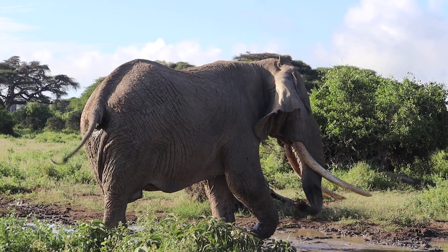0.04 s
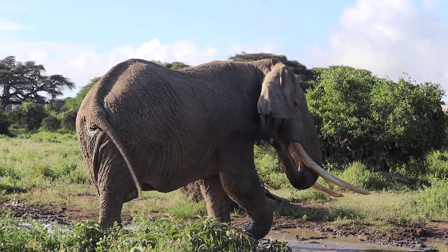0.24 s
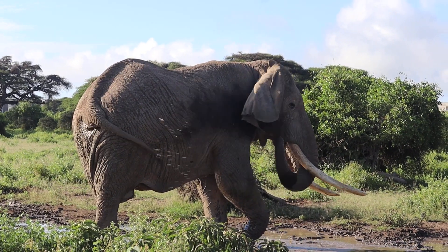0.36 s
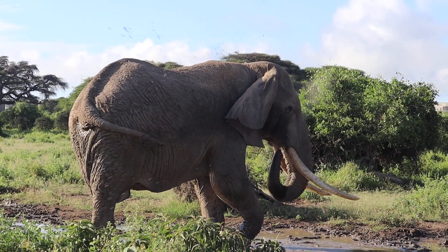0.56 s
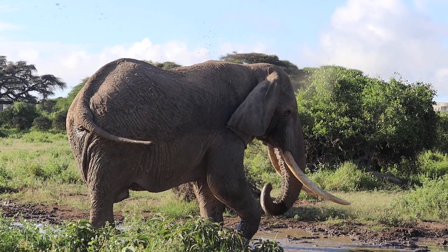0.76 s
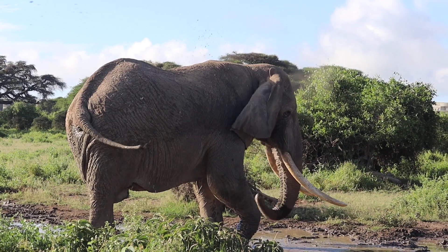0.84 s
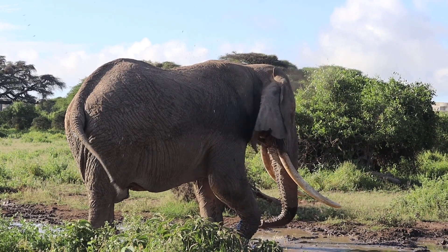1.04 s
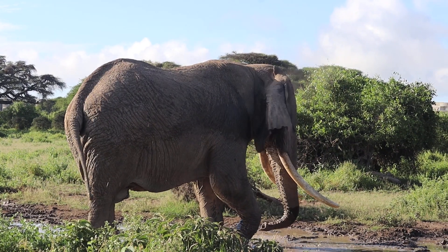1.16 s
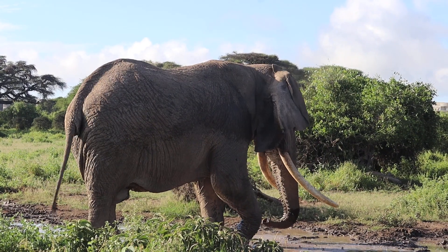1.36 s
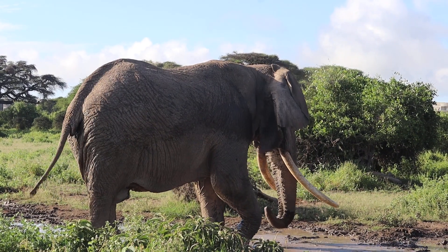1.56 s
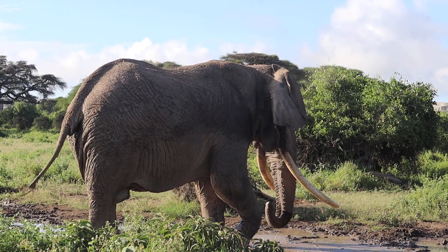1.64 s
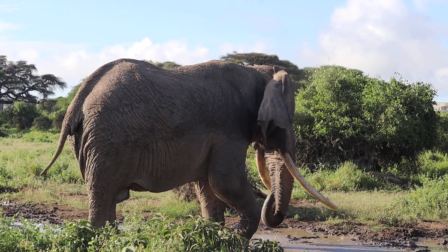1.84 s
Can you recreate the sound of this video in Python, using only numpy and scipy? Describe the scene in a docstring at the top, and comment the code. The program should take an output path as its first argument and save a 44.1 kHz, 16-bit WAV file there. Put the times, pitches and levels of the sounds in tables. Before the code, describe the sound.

An elephant close by sprays muddy water from its trunk, with air rushing and gurgling from about 0.2 to 0.9 seconds. The spray hits its hide, loudest near 0.5, and mud lumps smack down around 0.7. Drops and soft splats patter on to the end. Crickets trill throughout over a faint low hum like a far engine, and a distant bird gives one rising whistle at 1.8 seconds.

```python
"""Crickets trill round a waterhole, a few drops fall, and a low hum like a far engine lies under it all.
Near the stereo microphones an elephant blows muddy water from its trunk over its flank:
air rushes through the trunk and rings it, the spray hits the hide, then drops and lumps of mud
patter down. At the end a bird whistles once, far off."""
import sys
import numpy as np
from scipy import signal
from scipy.fft import rfft, irfft
from scipy.io import wavfile

SR = 44100
rng = np.random.default_rng(int(sys.argv[2]) if len(sys.argv) > 2 else 0)


def transcribe(u):
    """Save the signal u as a 16-bit wav file named by the first command-line argument.

    u: samples, shape (n,) or (channels, n), limited to [-1, 1]; the rate is SR.
    q: integer samples, one column per channel.
    """
    v = np.clip(np.atleast_2d(u).T, -1, 1)
    q = np.round(v * 32767).astype(np.int16)
    wavfile.write(sys.argv[1], SR, q)


N = 83790
T, HZ = np.arange(N) / SR, np.fft.rfftfreq(N, 1 / SR)

AIR_TONE = [(15, -36), (28, -20), (42, 1), (52, -5), (82, -5), (130, -2), (175, -4), (240, -8), (900, -9.5),
            (2800, -8), (4200, -8.5), (8000, -30.5), (16000, -44)]  # open air over the waterhole: f/Hz, level/dB
AIR_LIKENESS = [(60, .998), (300, 0.97), (1400, .72), (4000, 0.14), (15000, 0.096)]  # that air at the two microphones: f/Hz, correlation
# nearer crickets: first chirp t/s, period/s, level/dB, left minus right/dB, left phase lead/rad
CRICKETS = [(0.006, .0898, -34.5, -0.5, 2.5), (0.0795, .0875, -35, 1, 2.2), (0.002, .0745, -40.5, -1, -2.0)]
CHORUS_TONE = [(4200, -26), (4600, -11.5), (4900, -3), (5150, -3), (5520, -7), (5720, -30), (6200, -35)]  # far crickets: f/Hz, level/dB
DRIP_LEVEL = [(0.0, -58), (0.05, -60), (0.07, -46), (0.115, -64.5), (0.9, -50), (1.06, -57), (1.19, -51.5),
              (1.275, -46.5), (1.36, -48.5), (1.46, -47), (1.65, -49.5), (1.72, -56.5), (1.82, -50),
              (1.9, -55)]  # water dripping to the ground: t/s, level/dB
DRIP_TONE = [(150, -29), (450, -16.5), (750, -8.5), (1400, -1), (2900, 0.5), (4200, -7.5), (7000, -9.5),
             (16000, -21)]  # its patter: f/Hz, level/dB
# soft mud splats and, at 0.652 s, a short gurgle in the trunk: t/s, level/dB, centre f/Hz, decay/s
SPLATS_AND_GURGLE = [(0.0, -49, 173, 0.043), (0.016, -45, 2300, 0.0059), (0.344, -39, 278, 0.026),
                     (0.349, -36, 1260, 0.021), (0.431, -46.5, 117, 0.076), (0.652, -38, 660, .03),
                     (0.705, -54, 176, 0.077), (0.778, -39, 1200, .012), (0.919, -49.5, 660, 0.016),
                     (1.615, -57, 300, .025), (1.262, -43.5, 1130, 0.017), (1.264, -46, 2370, 0.015),
                     (1.31, -43, 2420, 0.0096), (1.383, -41.5, 1240, 0.019), (1.405, -41.5, 2070, 0.0084),
                     (1.452, -43, 3380, 0.012), (1.52, -49, 6500, .012), (1.491, -35, 2560, 0.0063),
                     (1.501, -39, 2180, 0.0044), (1.527, -39.5, 1840, 0.0063), (1.559, -39.5, 1350, 0.018),
                     (1.564, -49, 650, 0.013), (1.618, -46.5, 2780, 0.081), (1.734, -41.5, 2060, 0.0071),
                     (1.84, -49, 824, 0.066)]
TIP_LEVEL = [(0.14, -85), (0.18, -40.5), (0.245, -44.5), (0.295, -36), (0.335, -38.5), (0.36, -35),
             (0.41, -35.5), (0.46, -39), (0.56, -38.5), (0.66, -36.5), (0.79, -36), (0.87, -48),
             (0.97, -53), (1.05, -64)]  # air through the trunk tip: t/s, level/dB
TIP_PITCH = [(0.17, 1170), (0.29, 1197), (0.35, 1257), (0.45, 1120), (0.59, 1105), (0.74, 1112),
             (0.85, 1332), (0.95, 1166)]  # main resonance of the tip: t/s, f/Hz
TIP_MODES = [(0.799, 225, -9), (0.981, 194, -1.5), (1.17, 259, -6), (1.62, 450, -10.5), (2.4, 800, -13)]  # resonances that move with it: frequency ratio, width/Hz, level/dB
TUBE_LEVEL = [(0.26, -82), (0.3, -52), (0.36, -51.5), (0.46, -46), (0.6, -48.5), (0.72, -40), (0.8, -48),
              (0.93, -56), (1.02, -82)]  # low rush inside the trunk: t/s, level/dB
TUBE_MODES = [(123, 61, -8), (174.7, 54, -3.5), (286, 170, -7.5), (450, 180, -8), (669, 235, 1.5)]  # resonances of that tube: f/Hz, width/Hz, level/dB
SPRAY_LEVEL = [(0.15, -62), (0.175, -39.5), (0.25, -46), (0.32, -39.5), (0.37, -32), (0.446, -31),
               (0.461, -24.5), (0.497, -27.5), (0.524, -33.5), (0.62, -40.5), (0.71, -39), (0.77, -48.5),
               (0.86, -54.5), (1.0, -61)]  # spray landing on the hide: t/s, level/dB
SPRAY_TONE = [(150, -54), (400, -15.5), (620, -4.5), (1000, -4.5), (1700, -3), (2300, -3), (3700, -3.5),
              (4200, -8), (5000, -2.5), (7000, -21.5), (16000, -35)]  # its coarse drops: f/Hz, level/dB
MIST_LEVEL = [(0.17, -14), (0.33, -9), (0.4, -7), (0.47, -0.5), (0.58, 2.5), (0.7, -0.5), (0.8, 3),
              (1.0, -4)]  # rise and fall of fine mist within the spray: t/s, level/dB
MIST_TONE = [(150, -53), (3000, -9), (6500, 3.5), (9000, -0.5), (12000, -1), (16000, -6.5)]  # that mist: f/Hz, level/dB
SLAPS = [(0.1511, -24.5, 4100, 0.00037), (0.1516, -30, 3030, .0008), (0.634, -24, 1130, 0.00075),
         (0.7146, -12, 2420, 0.00027), (0.714, -24, 3720, 0.0002), (0.7178, -22.5, 1040, 0.00054),
         (0.7218, -23, 1060, 0.00053), (1.493, -37, 2850, 0.00051)]  # single lumps landing: t/s, level/dB, f/Hz, time to peak/s
BIRD_PITCH = [(1.78, 2872), (1.84, 3380), (1.895, 4150)]  # the far whistle: t/s, f/Hz
NEAR_LIKENESS = [(60, .998), (300, 1), (1400, 0.91), (3100, 0.64), (7000, 0.64), (15000, 0.29)]  # the elephant's noise at the two microphones: f/Hz, correlation
ELEPHANT_PAN = [(100, -2), (800, 0), (2400, -3.5), (4400, -4), (8000, -2), (15000, -12.5)]  # balance from where it stands: f/Hz, left minus right/dB
BOUNCES = [(.0031, -20.5), (.0064, -14.5), (0.0136, -15.5)]  # reflections off ground and body: delay/s, level/dB

AIR_DB, HUM_DB, HUM_HZ, HUM_WAVER = -54.5, -57, 62, 0.19
CHIRP_S, CHIRP_TOP_HZ, CHIRP_END_HZ, CHIRP_JITTER_S = 0.03, 5696, 4746, .0007
CHORUS_DB, BIRD_DB = -42, -49
BUBBLE_LOW_HZ, BUBBLE_HIGH_HZ, BUBBLES_PER_S = 656.4, 3710, 12  # the rate is for each size
BUBBLE_DECAY_CYCLES, BUBBLE_GLIDE, BUBBLE_DB = 4, 3.23, -7  # the level is against the patter
SWELL_RISE_S, SWELL_WIDTH = 0.0058, 0.53  # the width is a share of the pitch
GURGLE_DEPTH, GURGLE_HZ, FLUTTER_DB, FLUTTER_HZ = 0.048, 69, 1, 90
MIST_TRIM_DB = -1
ECHO_T60_S, CHIRP_ECHO_DB, GROUND_ECHO_DB, SLAP_ECHO_DB = 0.11, -1, -9, -3.5
LEFT_LEAD_S, BAND_LIMIT_HZ = .000006, 16050


def amp(db):
    """Decibels to gain."""
    return 10 ** (np.asarray(db) / 20)


def unit(x):
    """Scales to rms 1."""
    return x / np.sqrt(np.mean(x ** 2) + 1e-20)


def curve(points):
    """Joins points by straight lines in time."""
    return np.interp(T, *np.transpose(points))


def level(points):
    """Gain along a dB curve, dying away after its last point."""
    return amp(curve(points) - 260 * np.maximum(T - points[-1][0], 0))


def spectrum(points):
    """Joins points on a log-frequency axis."""
    f, value = np.transpose(points)
    return np.interp(np.log(HZ + 1), np.log(f + 1), value)


def colour(x, tone):
    """Gives x a spectrum, at rms 1."""
    return unit(irfft(rfft(x) * amp(spectrum(tone)), N))


def wander(hz):
    """Random drift up to about this rate, at rms 1."""
    return unit(irfft(rfft(rng.standard_normal(N)) / (1 + (HZ / hz) ** 4), N))


def noise(likeness=NEAR_LIKENESS):
    """White noise, partly alike at the two microphones."""
    left, other = rfft(rng.standard_normal((2, N)))
    alike = np.clip(spectrum(likeness), 0, 1)
    right = alike * left + np.sqrt(1 - alike ** 2) * other
    return irfft(np.array([left, right]), N)


def resonate(x, hz, width):
    """A steep resonance that can follow a pitch curve, with the bass cut, at rms 1."""
    carrier = np.exp(2j * np.pi * np.cumsum(hz * np.ones(N)) / SR)
    pole = np.exp(-np.pi * width / SR)
    x = signal.lfilter(*signal.butter(2, .5 * np.mean(hz), "high", fs=SR), x)
    envelope = signal.lfilter([1], np.poly([pole, pole]), x / carrier)
    return unit((carrier * envelope).real)


def echo(x):
    """Scatter from ground and bushes, different at each microphone."""
    tail = rng.standard_normal((2, N)) * amp(-60 * T / ECHO_T60_S) * (T > .002)
    return signal.fftconvolve(x[None], tail / np.linalg.norm(tail[0]), axes=1)[:, :N]


def drops(per_s, spread_db, share):
    """Impacts of uneven size and side carry a share of the power; a wash of tiny ones has the rest."""
    hits = rng.random(N) < per_s / SR
    size = amp(spread_db * np.minimum(rng.exponential(1, N), 3))
    impacts = hits * size * rng.choice([-1, 1], N)
    lean = 0.36 * rng.standard_normal(N)
    panned = unit(impacts * np.array([1 + lean, 1 - lean]))
    return np.sqrt(share) * panned + np.sqrt(1 - share) * noise()


def air_and_hum():
    """Open air all round, and a low, wavering hum like a far engine."""
    hz = HUM_HZ + 0.53 * wander(14)
    hum = np.sin(2 * np.pi * np.cumsum(hz) / SR) * (1 + HUM_WAVER * wander(8.5))
    return amp(AIR_DB) * colour(noise(AIR_LIKENESS), AIR_TONE) + amp(HUM_DB) * unit(hum)


def crickets():
    """Each wing stroke is a falling tone, out of step at the microphones; a far chorus blurs to a band."""
    out = amp(CHORUS_DB) * colour(rng.standard_normal((2, N)), CHORUS_TONE)
    for first, period, db, pan_db, lead in CRICKETS:
        age = (T - first + CHIRP_JITTER_S * wander(5)) % period
        stroke = np.minimum(age / CHIRP_S, 1)
        hz = CHIRP_TOP_HZ + (CHIRP_END_HZ - CHIRP_TOP_HZ) * stroke + 50 * wander(207)
        phase = 2 * np.pi * np.cumsum(hz) / SR + np.array([[lead], [0]])
        song = np.sin(np.pi * stroke ** 0.87) * np.sin(phase) * amp(db + 1.2 * wander(8))
        out += (song + amp(CHIRP_ECHO_DB) * echo(song[0])) * amp([[pan_db / 2], [-pan_db / 2]])
    return out


def dripping():
    """Drops run off and patter on the mud; trapped bubbles ring briefly, rising in pitch."""
    patter = colour(drops(per_s=1500, spread_db=5.8, share=0.57), DRIP_TONE)
    age = T[:SR // 25]
    bubbles = np.zeros(N)
    for hz in np.geomspace(BUBBLE_LOW_HZ, BUBBLE_HIGH_HZ, 24):
        cycles = hz * age * (1 + BUBBLE_GLIDE * age)
        ring = np.sin(2 * np.pi * cycles) * cycles * np.exp(-cycles / BUBBLE_DECAY_CYCLES)
        births = (rng.random(N) < BUBBLES_PER_S / SR) * rng.uniform(0.38, 1, N)
        bubbles += signal.oaconvolve(births, ring)[:N]
    return (patter + amp(BUBBLE_DB) * unit(bubbles)) * level(DRIP_LEVEL)


def splats_and_gurgle():
    """Soft mud splats and a short gurgle in the trunk, each a swell of noise round one pitch."""
    out = np.zeros((2, N))
    for start, db, hz, decay in SPLATS_AND_GURGLE:
        age = np.maximum(T - start, 0)
        rise = np.minimum(age / SWELL_RISE_S, 1)
        fall = np.exp(-np.maximum(age - SWELL_RISE_S, 0) / decay)
        out += amp(db) * rise * fall * resonate(noise(), hz, SWELL_WIDTH * hz)
    return out


def trunk():
    """Air, made to gurgle and sputter by water, rings the tip and the long tube of the trunk."""
    tip = np.zeros((2, N))
    for ratio, width, db in TIP_MODES:
        breath = noise()
        gurgle = 1 + GURGLE_DEPTH * wander(GURGLE_HZ)  # water in the tip shifts the resonance
        tip += amp(db) * resonate(breath, ratio * curve(TIP_PITCH) * gurgle, width)
    tube = sum(amp(db) * resonate(noise(), hz, width) for hz, width, db in TUBE_MODES)
    sputter = unit(amp(FLUTTER_DB * wander(FLUTTER_HZ)))
    return (level(TIP_LEVEL) * unit(tip) + level(TUBE_LEVEL) * unit(tube)) * sputter


def spray():
    """Coarse drops and fine mist strike the hide in clumps."""
    coarse = colour(drops(per_s=6000, spread_db=3.5, share=0.46), SPRAY_TONE)
    mist = colour(drops(per_s=9000, spread_db=1.3, share=0.45), MIST_TONE)
    mist *= amp(MIST_TRIM_DB + curve(MIST_LEVEL))
    clumps = unit(amp(0.79 * wander(150)))
    return (coarse + mist) * level(SPRAY_LEVEL) * clumps


def slaps():
    """Lumps of mud smack down: a few cycles, then a little scatter."""
    out = np.zeros(N)
    for start, db, hz, peak_s in SLAPS:
        age = np.maximum(T - start, 0)
        pulse = (age / peak_s * np.exp(1 - age / peak_s)) ** 2
        out += amp(db) * pulse * np.sin(2 * np.pi * hz * age)
    return out + amp(SLAP_ECHO_DB) * echo(out)


def bird():
    """One rising, slightly rough whistle from far off."""
    start, end = BIRD_PITCH[0][0], BIRD_PITCH[-1][0]
    progress = np.clip((T - start) / (end - start), 0, 1)
    hz = curve(BIRD_PITCH) + 40 * wander(179.4)
    whistle = np.sqrt(abs(np.sin(np.pi * progress))) * np.sin(2 * np.pi * np.cumsum(hz) / SR)
    roughness = unit(amp(2.6 * wander(170)))
    return amp(BIRD_DB) * (whistle * roughness + amp(-8) * echo(whistle))


def to_microphones(x):
    """The way from the elephant: early reflections, a tiny lead on the left, treble leaning right."""
    paths = 1 + sum(amp(db) * np.exp(-2j * np.pi * HZ * delay) for delay, db in BOUNCES)
    balance = amp(np.outer([.5, -.5], spectrum(ELEPHANT_PAN)))
    lag = np.exp(-2j * np.pi * np.outer([0, LEFT_LEAD_S], HZ))
    return irfft(rfft(x) * paths * balance * lag, N)


def scene():
    """The waterhole from the microphones: elephant near, crickets all round, bird far off."""
    muddy_water = dripping() + splats_and_gurgle()
    muddy_water += amp(GROUND_ECHO_DB) * echo(muddy_water.mean(0))
    elephant = to_microphones(trunk() + spray() + muddy_water + slaps())
    return elephant + crickets() + bird() + air_and_hum()


def record(dry):
    """The recorder's band limit."""
    lowpass = signal.firwin(511, BAND_LIMIT_HZ, window=("kaiser", 9), fs=SR)
    return signal.oaconvolve(dry, lowpass[None], "same")


dry = scene()
out = record(dry)
transcribe(out)
```